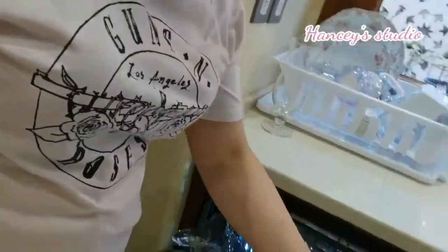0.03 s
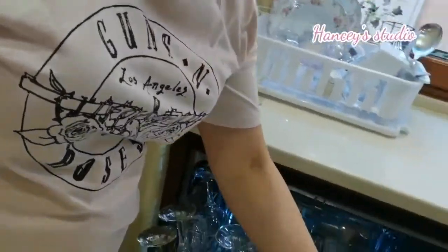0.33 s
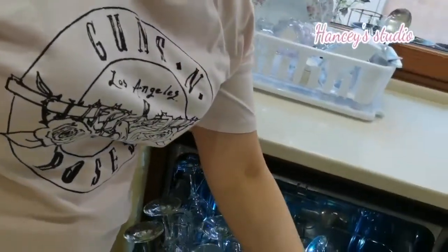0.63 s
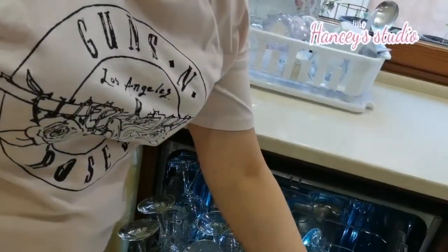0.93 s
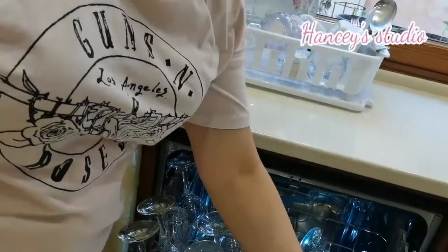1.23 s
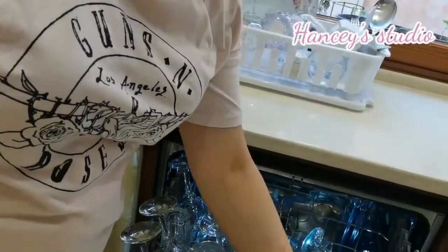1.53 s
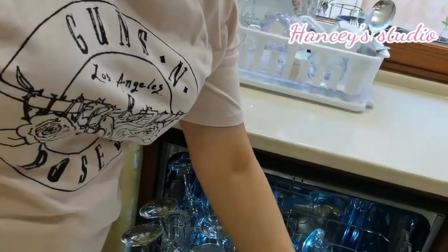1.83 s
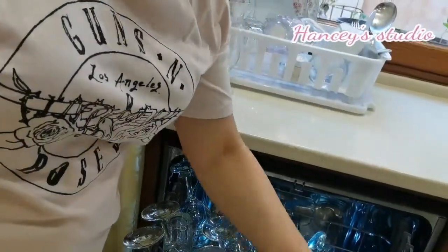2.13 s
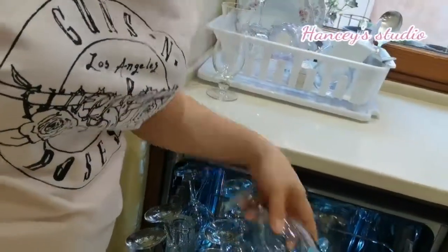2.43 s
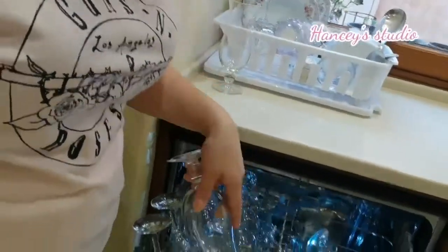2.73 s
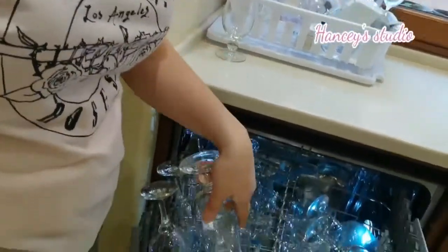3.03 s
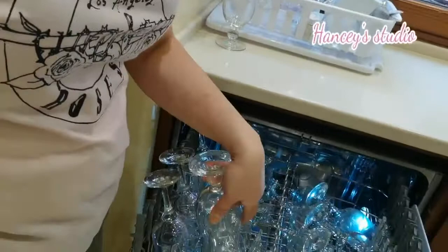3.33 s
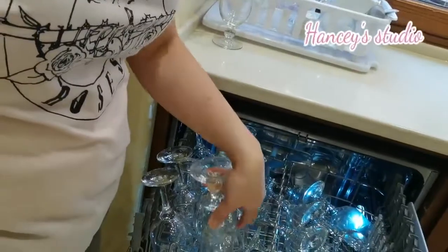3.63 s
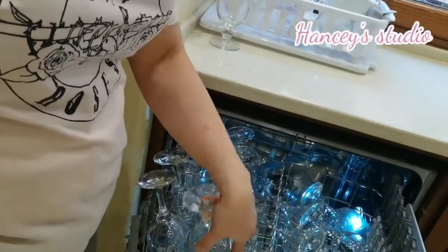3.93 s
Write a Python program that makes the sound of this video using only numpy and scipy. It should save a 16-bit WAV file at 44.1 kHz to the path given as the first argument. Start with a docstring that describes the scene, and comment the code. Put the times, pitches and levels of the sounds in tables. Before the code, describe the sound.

Glasses clink as they are shifted in a dishwasher rack, scattered at first, then louder and closer together. The wire rack knocks lightly beneath them. A faint ventilation drone fills the quiet kitchen, about a metre from the microphone.

```python
"""A hand rubs faintly among stemmed glasses over a low ventilation drone; then the glasses clink as they
are shifted in a dishwasher rack, in a quiet kitchen, about a metre from a stereo microphone.
Each contact is a short crack plus the ringing modes of a glass; the wire rack knocks and rings under them.
The steel tub and the hard kitchen walls draw every clink out."""
import sys
import numpy as np
from scipy import signal
from scipy.fft import rfft, irfft
from scipy.io import wavfile

SR = 44100
rng = np.random.default_rng(int(sys.argv[2]) if len(sys.argv) > 2 else 0)


def generate_wav(sig):
    """Save sig (samples, or channels by samples) to the path in sys.argv[1] as 16-bit PCM at SR."""
    pcm = np.round(np.clip(np.atleast_2d(sig).T, -1, 1) * 32767).astype(np.int16)
    wavfile.write(sys.argv[1], SR, pcm)


N = 176400

# glass contacts: t/s, glass, ring level/dB at RING_BANDS, crack level/dB at CRACK_BANDS, left over right/dB
CONTACTS = [ (0.568, "held", (-29, -10.5, -19, -7, -16.5, -17), (0, -2, -5.5, -20), 1),
            (.722, "tall", (-36, -27, -44, -49, -17, -16), (-18, -6.5, -5.5, -37), 0.5),
            (.794, "held", (-33, -22, -34, -29, -26, -28), (-10, -21, -6, -38), 7),
            (1.278, "tall", (-11, -23, -4, -13, 5, -5.5), (-3.5, -1, 10.5, 5), 3),
            (1.585, "small", (-54, -15.5, -30.5, -18.5, -23.5, -31.5), (-50, -25.5, -18, -53), 9),
            (2.045, "wide", (-26, -42, -36.5, -19, -11, -32.5), (-49, -5.5, -9.5, -24), 4.5),
            (2.100, "held", (-16, 8, -1.5, -24, 9, -5), (-5, 6.5, 9, 2), 3.5),
            (2.104, "tall", (-4.5, -12.5, 2.5, 13.5, 1.5, 5.5), (-6, -0.5, 18, 10.5), 5),
            (2.110, "tall", (-6.5, -3.5, -0.5, 7, 3, 5), (-2.5, 7, 4.5, 4.5), 1.5),
            (2.174, "held", (-19, 2, 0, -2, -4, 1.5), (-5, 7.5, 2, -27), 4.5),
            (2.967, "held", (-13.5, -5, -13, -8.5, -22, -18.5), (-4.5, 5.5, -8, -16), 1),
            (3.108, "held", (-9, 8.5, 9.5, -2, 2, 3), (10.5, 18.5, 14, -4), -0.5),
            (3.124, "held", (-19, 8.5, 7, -4, -6, -3), (8.5, 4, 1, -16), 8.5),
            (3.266, "wide", (-8.5, -18.5, -22, -9.5, -2, -15), (4.5, -2, 12, -14), -0.5),
            (3.393, "small", (-23, -28, -30, -9.5, -14, -17.5), (-14, -6, -1, -27), 2.5),
            (3.456, "held", (8.7, 17.4, 13.5, 3.6, 9.9, 11.8), (8.5, 21.5, 7, -1), 1.5),
            (3.541, "held", (13, 3, 12, 8.5, 4, 0), (20.3, 19.7, 19, 1.6), 2),
            (3.546, "wide", (2, 4, 5, 6, 9, -2.5), (-16, 3, 7, 14), 6.5),
            (3.712, "held", (-18, -18, -14, -17, -19, -14.5), (0.5, -0.5, -18, -20), -3)]
# pitches at which a contact's ring and its crack are shaped: f/Hz
RING_BANDS = [1850, 4200, 5400, 6900, 7900, 10000]
CRACK_BANDS = [700, 2200, 7000, 13000]
# modes of each glass: f/Hz
MODE_HZ = { "held": (1852, 3731, 4023, 4062, 4438, 4610, 5428, 6853, 7862, 9790, 10027, 13450, 14470),
           "tall": (1093, 1560, 1830, 2353, 2570, 4250, 4737, 6772, 6955, 8861, 9814, 10230, 10412, 11900),
           "small": (3030, 4888, 5440, 7063, 7895, 8861, 10035),
           "wide": (886, 1850, 4135, 4468, 4603, 6480, 6900, 7391, 9320, 9900, 11200)}
# strength of those modes: level/dB
MODE_DB = { "held": (0.5, -17.5, -1, -5.5, -2, -20.5, -5.5, 1.5, 2, -6, -1.5, -22.5, -24),
           "tall": (-19.5, -8.5, -2.5, -9, 1, 5.5, -0.5, -5, -0.5, -15.5, -6.5, -5.5, -7, -7.5),
           "small": (-10.5, -0.5, -9.5, -2, 0, -7.5, 0.5),
           "wide": (-14.5, -6, -2, -2, -9, -4.5, -1.5, -3.5, -12.5, 0, -12)}
# ring time of each glass at T60_AT_HZ: t60/s
RING_TIME = {"held": 0.11, "tall": 0.081, "small": .08, "wide": 0.084}
# colour common to all cracks: f/Hz, level/dB
CRACK_SPECTRUM = [(30, -48.5), (100, -21.5), (300, -7.5), (600, -6), (850, -3), (1300, -4), (1700, -1.5),
                  (2500, -3.5), (3000, -3), (3450, -8.5), (4400, -8.5), (5900, -8), (7300, -2), (8600, -17),
                  (10000, 0), (11200, -15), (14800, -9), (15700, -32)]
# light knocks on the rack: t/s, level/dB at CRACK_BANDS
RACK_KNOCKS = [(0.826, (-13, -8, -8, -27)), (.876, (-4.5, -7, -5.5, -14.5)), (0.896, (-27, -25, -20, -14)),
               (1.412, (-2.5, -7.5, -5.5, -41)), (1.52, (-53, -16, -14, -48)),
               (1.827, (-21, -19.5, -10.5, -42)), (2.728, (-32, -39, -25, -36.5)), (3.53, (11, 9, -3, -16)),
               (3.924, (-14, -7, -14, -58))]
# wires and frame of the rack set ringing: t/s, f/Hz, level/dB, t60/s
RACK_MODES = [(.567, 790, -17, 0.22), (.567, 2555, -17.5, 0.17), (1.278, 1099, -22, 0.35),
              (2.967, 513, -15, 0.15), (3.108, 497.5, -9.5, 0.11), (3.456, 496, -12.5, .2),
              (3.541, 504.6, -0.5, 0.068), (3.541, 881, -4.5, 0.39), (3.76, 2540, -14.5, .15)]
# colour of the hand's rubbing: f/Hz, relative level/dB
RUB_SPECTRUM = [(800, -7), (1700, -4), (2500, 2), (3300, -13.5), (4300, 3), (5300, -8.5), (6400, -1.5),
                (8000, -8), (9500, -15.5)]
# loudness of the rubbing: t/s, level/dB
RUB_LEVEL = [(0, -64), (.06, -65), (.36, -66.5), (.5, -84), (.6, -100)]
# reverberation of the kitchen: f/Hz, t60/s
KITCHEN_T60 = [(900, .66), (5000, .64), (14000, 0.25)]
# ventilation drone: f/Hz, relative level/dB
DRONE_SPECTRUM = [(15, -32), (25, -4), (54, -12), (130, 4), (162, -8.5), (189, -0.5), (217, -8), (303, -9),
                  (344, -18.5), (390, -20), (424, -24.5), (454, -21), (700, -38.5), (910, -58),
                  (1540, -120)]
# background hiss: f/Hz, relative level/dB
HISS_SPECTRUM = [(400, -1.5), (700, 2.5), (1500, -5.5), (4000, -7), (8000, -14.5), (15000, -11.5),
                 (16500, -35.5)]

T60_AT_HZ, T60_FALL = 4000, 0.16  # higher modes die sooner, by this power of pitch
NEIGHBOUR_FROM_HZ, NEIGHBOUR_DB, NEIGHBOUR_DETUNE, NEIGHBOUR_T60_S = 4100, -14.5, 0.028, .12
CRACK_S, CRACK_DB = .0009, -0.5
TUB_T60_S, TUB_DB, DIRECT_DB = 0.1, 0, -6  # levels relative to the kitchen's tail
LEFT_LAG_S, WIDE_HZ = .00004, 1300  # above WIDE_HZ the left and right echoes grow unlike
DRONE_DB, DRONE_PAN_DB, DRONE_SIDE_DB, HISS_DB = -55.5, -6.5, -4.5, -70.5
TOP_HZ = 15800
TAIL = 32768  # samples given to each blow


def glasses():
    """Each contact cracks and rings one glass; where it is touched decides which modes speak."""
    out = np.zeros((2, N))
    for start, glass, ring_db, crack_db, pan_db in CONTACTS:
        path = path_to_microphone()
        touch = list(zip(RING_BANDS, ring_db))
        modes = [(hz, db + along(hz, touch), RING_TIME[glass] * (T60_AT_HZ / hz) ** T60_FALL)
                 for hz, db in zip(MODE_HZ[glass], MODE_DB[glass])]
        clink = ring(modes + neighbours(modes), path) + crack(crack_db, path)
        add(out, start, clink * pan(pan_db))
    return out


def neighbours(modes):
    """Like glasses ring along with the high modes, a little flat and a little sharp."""
    return [(hz * (1 + NEIGHBOUR_DETUNE * rng.uniform(0.4, 1.5) * sign), db + NEIGHBOUR_DB, NEIGHBOUR_T60_S)
            for hz, db, _ in modes if hz > NEIGHBOUR_FROM_HZ for sign in (-1, 1)]


def ring(modes, path):
    """Damped modes (f/Hz, level/dB, t60/s), each reaching the microphone at its own strength."""
    freqs = np.fft.rfftfreq(TAIL, 1 / SR)
    delay = np.exp(-2j * np.pi * freqs / SR)  # one sample
    path_power = np.abs(path) ** 2
    spectrum = 0
    for hz, db, t60 in modes:
        decay = np.exp(-np.log(1000) / (t60 * SR))
        feedback = decay ** 2 * delay - 2 * decay * np.cos(2 * np.pi * hz / SR)
        mode = (1 - delay) / (1 + delay * feedback)
        mode /= 1 + 1j * (freqs / hz - hz / (freqs + 1)) * 6.5  # Q: it radiates only near its own pitch
        energy = 2 * np.sum(path_power * np.abs(mode) ** 2, axis=1, keepdims=True) / TAIL
        spectrum = spectrum + mode * (undb(db) / np.sqrt(energy))
    return irfft(spectrum * path)


def crack(band_db, path):
    """The contact itself: a click and a millisecond of grit, coloured by what is touched."""
    t, hz = np.arange(TAIL) / SR, np.fft.rfftfreq(TAIL, 1 / SR)
    click = .5 * unit(rng.standard_normal(TAIL) * np.exp(-t / CRACK_S))
    click[0] += 1
    colour_db = CRACK_DB + along(hz, CRACK_SPECTRUM) + along(hz, list(zip(CRACK_BANDS, band_db)))
    return irfft(rfft(unit(click)) * causal(colour_db) * path)


def rack():
    """Dull knocks on the coated wires, and the notes of the rack as a glass is pushed in."""
    out = np.zeros((2, N))
    for start, crack_db in RACK_KNOCKS:
        add(out, start, crack(crack_db, path_to_microphone()))
    for start, hz, db, t60 in RACK_MODES:
        add(out, start, ring([(hz, db, t60)], path_to_microphone()))
    return out


def hand_rub():
    """Soft rubbing in the first half second, as the hand reaches in."""
    times, db = np.array(RUB_LEVEL).T
    return undb(np.interp(np.arange(N) / SR, times, db)) * stereo_noise(RUB_SPECTRUM)


def path_to_microphone():
    """Stereo frequency response from a spot in the rack: direct sound, quick tub echoes, kitchen tail."""
    t, hz = np.arange(TAIL) / SR, np.fft.rfftfreq(TAIL, 1 / SR)
    mid, side = rfft(rng.standard_normal((2, TAIL)))
    likeness = 1 / (1 + (hz / WIDE_HZ) ** 2)
    diffuse = (mid * np.sqrt(1 + likeness) + np.array([side, -side]) * np.sqrt(1 - likeness)) / np.sqrt(2)
    room = 0
    for band_hz, t60 in KITCHEN_T60:
        share = along(hz, [(f, f == band_hz) for f, _ in KITCHEN_T60])
        room = room + irfft(diffuse * share) * np.exp(-np.log(1000) * t / t60)
    tub = irfft(diffuse)[:, ::-1] * np.exp(-np.log(1000) * t / TUB_T60_S)  # reversed: its own echo pattern
    direct = np.exp(-2j * np.pi * hz * np.array([[LEFT_LAG_S], [0]]))
    echoes = rfft(unit(room) + undb(TUB_DB) * unit(tub))
    return (echoes + undb(DIRECT_DB) * direct) / np.sqrt(1 + undb(TUB_DB) ** 2 + undb(DIRECT_DB) ** 2)


def room_tone():
    """Ventilation drones to the right of the microphone, under a thin even hiss."""
    spectrum = list(DRONE_SPECTRUM) + [(1500, -55.5), (4000, -84.5)]  # with a faint upper skirt
    drone = noise(spectrum) + undb(DRONE_SIDE_DB) * stereo_noise(spectrum)
    return undb(DRONE_DB) * drone * pan(DRONE_PAN_DB) + undb(HISS_DB) * stereo_noise(HISS_SPECTRUM)


def noise(points):
    """Noise of rms 1, shaped by (f/Hz, level/dB) points."""
    gain = undb(along(np.fft.rfftfreq(N, 1 / SR), points))
    return unit(irfft(rfft(rng.standard_normal(N)) * gain, N)) * np.sqrt(N)


def stereo_noise(points):
    """Independent noise on the left and on the right."""
    return np.array([noise(points), noise(points)])


def undb(db):
    """Decibels to gain."""
    return 10 ** (np.asarray(db) / 20)


def along(hz, points):
    """Read (f/Hz, value) points on a log-frequency axis."""
    freqs, values = np.array(points, float).T
    return np.interp(np.log(np.maximum(hz, 1)), np.log(freqs), values)


def unit(x):
    """Scale each channel to unit energy."""
    return x / np.sqrt(np.sum(x ** 2, axis=-1, keepdims=True))


def pan(db):
    """Channel gains that put the left db above the right."""
    return undb(np.array([[db], [-db]]) / 2)


def causal(db):
    """Minimum-phase response with the given dB shape, so that it starts at once."""
    cepstrum = irfft(db * np.log(10) / 20)
    cepstrum[1:len(cepstrum) // 2] *= 2
    cepstrum[len(cepstrum) // 2 + 1:] = 0
    return np.exp(rfft(cepstrum))


def add(out, start, blow):
    """Mix a blow in at start seconds and fade out its far tail."""
    i = int(start * SR)
    fade = np.minimum(1, np.linspace(2, 0, TAIL)) ** 2
    out[:, i:i + TAIL] += (blow * fade)[:, :N - i]


def scene():
    """Everything at the microphone, a metre from the rack."""
    return glasses() + rack() + hand_rub() + room_tone()


def record(dry):
    """The recorder cuts steeply above TOP_HZ."""
    return signal.sosfilt(signal.ellip(8, .2, 80, TOP_HZ, fs=SR, output="sos"), dry)


dry = scene()
out = record(dry)
generate_wav(out)
```